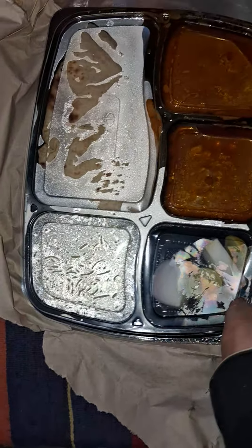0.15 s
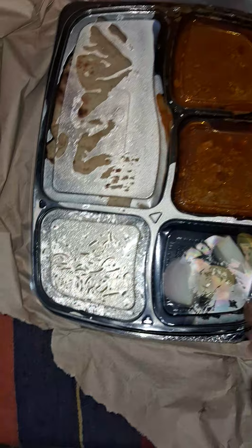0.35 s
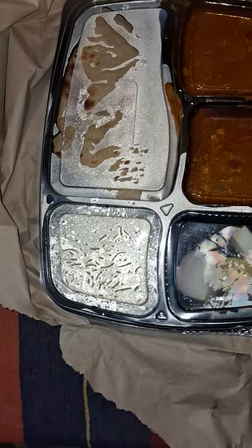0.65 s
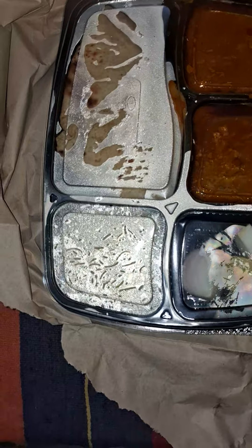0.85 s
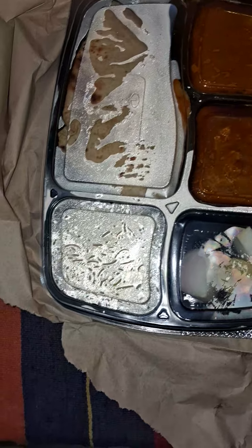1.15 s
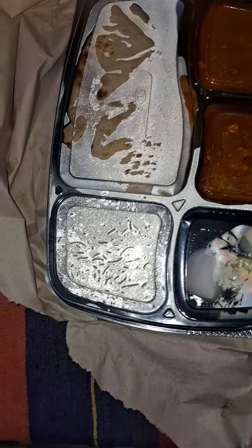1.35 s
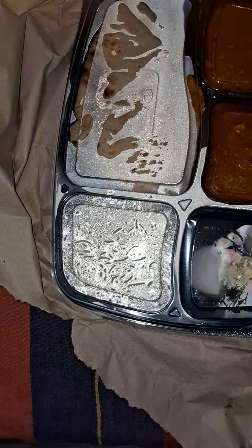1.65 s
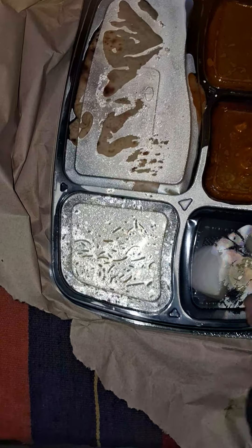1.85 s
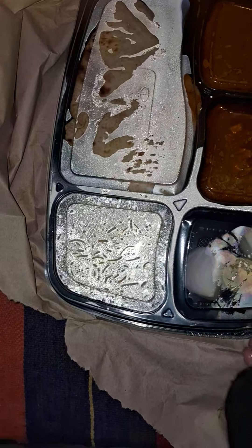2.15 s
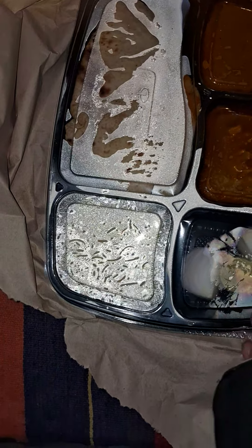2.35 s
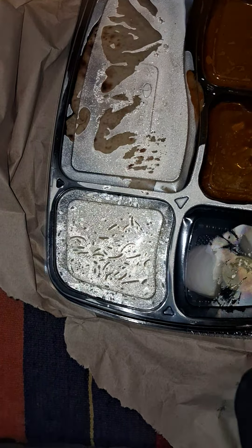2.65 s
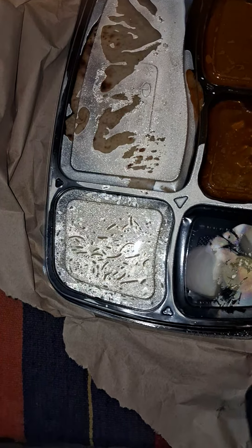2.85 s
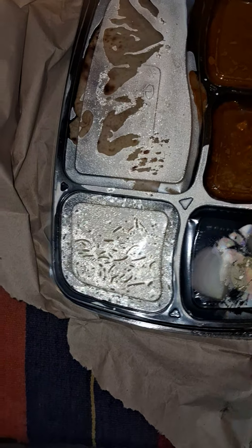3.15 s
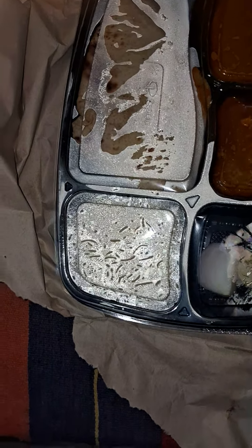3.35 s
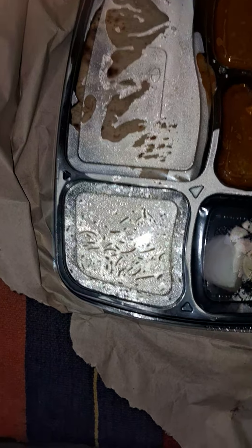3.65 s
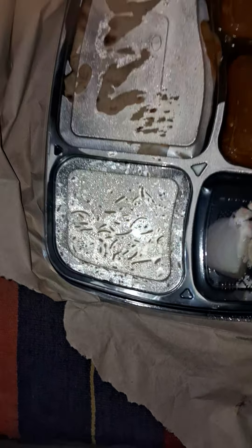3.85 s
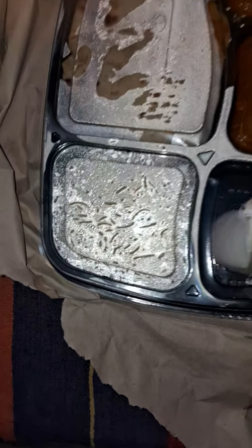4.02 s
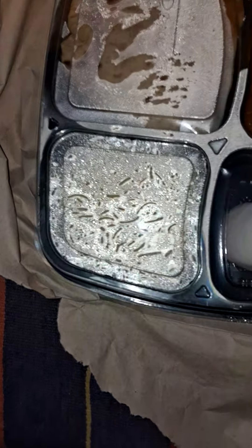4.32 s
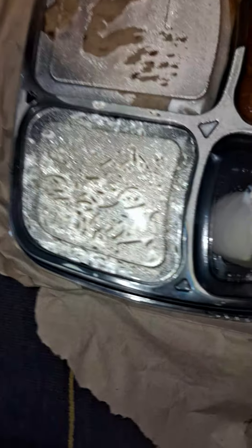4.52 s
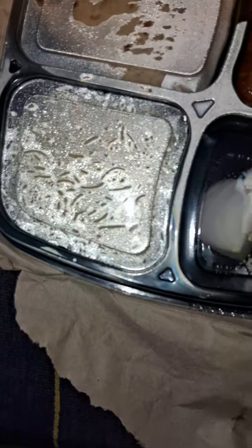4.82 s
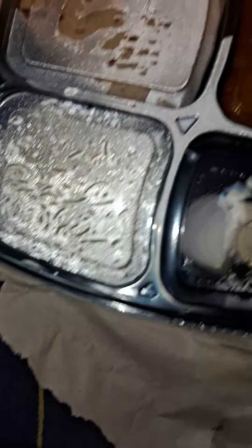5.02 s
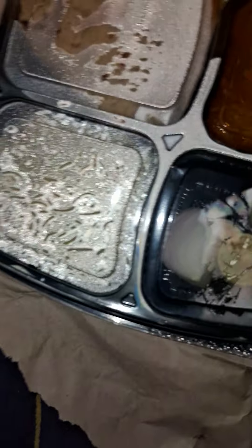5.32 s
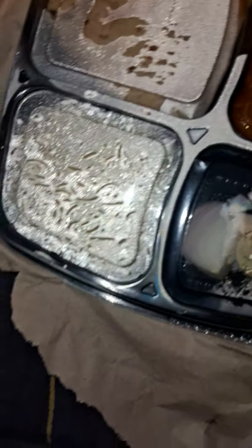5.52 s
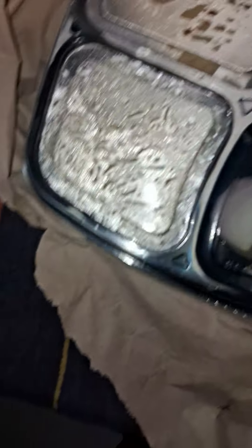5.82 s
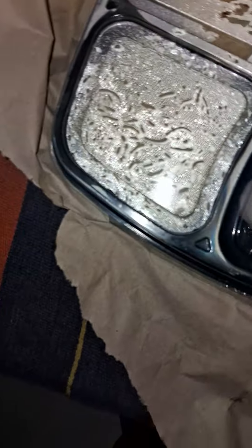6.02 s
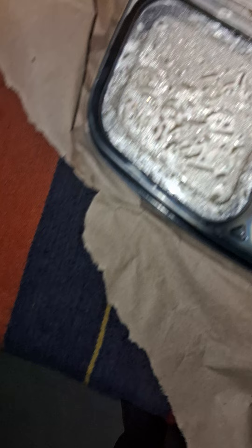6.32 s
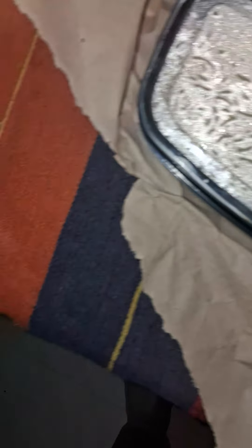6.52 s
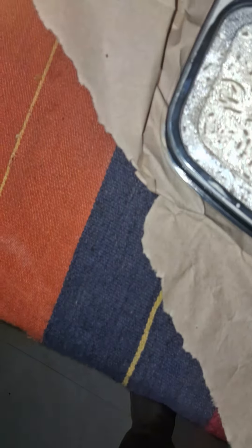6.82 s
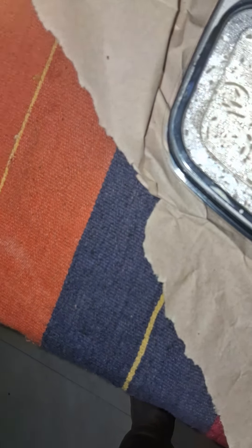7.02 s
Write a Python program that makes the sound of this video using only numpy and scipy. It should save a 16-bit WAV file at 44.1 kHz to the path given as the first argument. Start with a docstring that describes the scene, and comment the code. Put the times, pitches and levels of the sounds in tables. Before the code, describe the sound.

Paper wrapping rustles and crackles close up around a plastic meal tray, with sharp irregular plastic snaps in a small quiet room.

```python
"""Paper and film crackle round a plastic meal tray, worked by hand close to a phone in a small soft room.
Creases buckle with sharp snaps that ring the tray; between them the paper rustles in dense tiny creases,
the film hisses over the rim, and the tray creaks once. The room gives a short tail, over faint mains hum
and a low rumble that comes and goes, swelling into a thud under a loud tray snap.
Stereo, from the phone's two microphone ports."""
import sys
import numpy as np
from scipy import signal
from scipy.fft import rfft, irfft
from scipy.io import wavfile
from scipy.ndimage import uniform_filter1d

SR = 44100
rng = np.random.default_rng(int(sys.argv[2]) if len(sys.argv) > 2 else 0)


def dump(signal):
    """Clip the signal to [-1, 1] and save it as 16-bit WAV at the path in sys.argv[1]."""
    limited = np.clip(np.atleast_2d(signal).T, -1, 1)
    pcm = np.round(limited * 32767).astype(np.int16)
    wavfile.write(sys.argv[1], SR, pcm)


N = 316197

# quiet rustle between scrapes: t/s, level/dB, brightness/dB
QUIET_RUSTLE = [(0, -78, -1), (1.2, -73, -15), (1.45, -92, -6), (2.0, -84, -4), (2.6, -84, 0),
                (2.8, -70.5, 0), (3.1, -76, 0), (3.7, -70.5, -3), (4.3, -66.5, -11), (4.8, -62, -3.5),
                (5.3, -70.5, 0.5), (5.399, -77, 5), (5.7, -70.5, 5), (6.2, -66, -3), (6.9, -69, -1),
                (7.17, -87, 5)]
# scrapes of the paper, close up: start/s, length/s, level/dB, brightness/dB
PAPER_SCRAPES = [(0, .02, -64, -1.5), (0.087, 0.058, -62, -1), (0.314, 0.08, -66.5, 2.5),
                 (0.376, 0.15, -68, -2), (0.504, .025, -67, -12), (0.563, 0.084, -67.5, -2),
                 (0.642, 0.077, -60, -5), (0.752, 0.021, -58.5, 5.5), (0.911, 0.026, -71, 1),
                 (0.987, 0.051, -60, 5), (1.09, .18, -72.5, 2), (1.324, 0.065, -61, -22),
                 (1.51, 0.075, -58, -2), (1.62, 0.052, -62, -8), (1.711, 0.066, -66.5, -4.5),
                 (1.787, 0.077, -61.5, -4), (1.9, 0.026, -64, -7), (2, 0.022, -71.5, 5.5),
                 (2.097, .03, -73.5, -4), (2.217, 0.065, -61.5, -10), (2.28, .2, -68.5, 3.5),
                 (2.553, 0.025, -73, 2), (2.792, 0.13, -77, 4), (3.17, 0.05, -64, 4),
                 (3.278, 0.14, -62, 2.5), (3.451, 0.14, -59, -2), (3.81, 0.11, -60, -2.5),
                 (4.36, 0.31, -65.5, 2.5), (4.528, .14, -57, 3), (4.958, 0.062, -53.5, -8),
                 (5.034, 0.11, -61.5, 3.5), (5.403, 0.21, -58, -0.5), (5.816, .13, -55.5, 1.5),
                 (5.952, 0.024, -48.5, -1), (6.013, 0.048, -55.5, -8.5), (6.277, 0.12, -57.5, -5),
                 (6.472, 0.11, -63.5, 4.5), (6.677, 0.054, -66.5, 9.5), (7.07, 0.088, -65, 2.5)]
# resonances of the paper's low body, mid sheet and high hiss: f/Hz, width/Hz, level/dB
BODY_MODES = [(345, 173, -2), (641, 67, -3), (795, 272, 2), (1230, 400, -9.5)]
SHEET_MODES = [(1345, 220, 7.5), (2080, 235, 7.5), (2527, 1540, 1), (3740, 520, -10.5)]
HISS_MODES = [(5000, 1000, -10), (7310, 2000, 2), (10600, 8500, -4), (14300, 3200, -4.5)]
# crinkles against body, sheet and hiss: level/dB
CRINKLE_LEVELS = [-8, -7.5, -18]
# spectrum of the room tone: f/Hz, relative level/dB
ROOM_TONE = [(15, -52.5), (25, -26), (87, 3.5), (166, -3.5), (317, -7), (607, 8), (775, -6), (1130, -37),
             (1370, -3.5), (5570, -15), (7510, -15), (14800, -30.5), (16000, -36)]
# low rumble, swelling into a thud under the loud tray snap at 5.84 s: t/s, level/dB
LOW_RUMBLE = [(0, -94), (.18, -92), (.7, -99), (1.0, -84), (1.6, -89), (1.9, -100), (2.3, -86), (2.95, -86),
              (3.4, -99), (4.05, -80.5), (4.25, -68.5), (4.5, -81), (5.0, -98), (5.78, -77), (5.84, -65),
              (6.05, -90), (6.25, -100), (6.41, -75), (6.6, -68), (6.83, -77), (7.05, -100), (7.17, -100)]
# edges of the six bands of a snap (boom, knock, clack, tick, crack, sizzle): f/Hz
BAND_EDGES = [210, 500, 1100, 2200, 4500, 9500, 14800]
# colour common to all snaps, by band: level/dB
SNAP_COLOUR = [2.5, 0, 1.5, 6.5, 7.5, 4.5]
# part of each band that differs between the microphone ports: amplitude fraction
PORT_SPREAD = [.15, .3, .45, .6, .9, .95]
# snaps, close up: t/s, level/dB, favoured ring/Hz, crack/Hz,
# then relative: boom/dB, tick/dB, crack/dB, left minus right/dB, echo/dB
CREASE_SNAPS = [(0.035, -47, 1210, 5560, -20, -14.5, -31, -2.5, -15.5),
                (0.191, -55, 560, 4580, -3, -10, -27, 0, -19),
                (0.661, -48, 727, 7050, -14, -24, -28, 3, -14),
                (0.707, -48.5, 953, 8390, -19, -12, -20, 1.5, -10),
                (0.771, -42.5, 700, 8320, -25, -17, -13, 5, -12.5),
                (1.054, -44, 659, 4730, -20, -25, -27, 0.5, -19),
                (1.064, -42, 735, 7750, -12, -15, -17, -1, -17),
                (1.297, -28, 1790, 4510, -34, -20, -42, 1, -17.5),
                (1.391, -44.5, 700, 7180, -12, -30, -35, -3, -17),
                (1.545, -44.5, 570, 4650, -0.5, 1.5, -5.5, -4, -15.5),
                (1.911, -58, 640, 7600, -7, -12, -5.5, -1, -15),
                (2.024, -61, 2360, 5880, -20, 6, 5, -3, -12),
                (2.244, -60, 776, 6940, -11, -13, -3, 4.5, -14),
                (2.314, -36, 880, 9400, -13.5, 3, 0.5, -2, -16.5),
                (2.481, -48.5, 1770, 5440, -30, -1, -16, -7.5, -14),
                (2.551, -58.5, 1070, 4990, -24, -4, -10, -1.5, -17),
                (2.663, -21, 2010, 12100, -18, -4.5, -1.5, -1.5, -15.5),
                (2.846, -53, 1870, 6330, -13.5, -3, -1, 0.0, -21),
                (2.867, -56.5, 750, 4500, -17, -1, -8, -2.5, -15),
                (3.329, -41, 645, 6750, -12, -13, -18, 2.0, -14),
                (3.359, -42, 1960, 6560, -27, -8.5, -31, -10, -15),
                (3.405, -42, 1770, 7830, -23, -11, -20, 4, -14.5),
                (3.494, -40, 613, 4650, -17, -19, -24, 0.0, -15.5),
                (3.812, -47.5, 726, 5670, -22, 0, -10, -1, -11.5),
                (3.851, -40.5, 730, 5520, -29, -18, -28, 3.5, -24),
                (3.898, -22.5, 980, 7630, -15.5, -9.5, -20.5, -1, -21),
                (4.097, -26, 650, 5140, -30, -13, -24, 0.5, -21.5),
                (4.122, -29, 729, 5390, -29, -12.5, -33, 2, -22),
                (4.19, -13, 920, 5050, -22, -9.5, -20, 3.5, -19.5),
                (4.35, -33.5, 765, 7260, -21.5, -16, -16, 2, -18.5),
                (4.378, -54, 821, 6170, -2.5, -18, -22, 5, -25),
                (4.399, -30.5, 780, 5160, -18, -12, -17, 0, -20),
                (4.468, -45.5, 1410, 5620, -24, -2, -16, 2, -14),
                (4.6, -28, 596, 4500, -13.5, -4, -13.5, 3, -19),
                (4.623, -41, 920, 4500, -14, -13, -26, 1.5, -30),
                (4.762, -41.5, 870, 6900, -15.5, -22, -23, 4.5, -23),
                (4.821, -56.5, 1310, 7430, -7, -5, -4, 1.5, -19),
                (4.854, -26.5, 1030, 4510, -28, -1.5, -18.5, 4.5, -22),
                (4.965, -44.5, 800, 4910, -32, -0.5, -32, 4, -11.5),
                (5.149, -31, 774, 4590, -26, -11, -37, 3.5, -17.5),
                (5.17, -38, 1790, 4810, -21.5, -21, -31, -1.0, -24),
                (5.212, -19, 910, 5240, -27, -6, -13, -0.5, -21),
                (5.313, -51, 710, 5390, -22, -15, -14, 4, -24),
                (5.422, -37.5, 885, 4540, -15, -1, -13.5, 2.5, -18.5),
                (5.487, -44, 907, 4650, -11, -7, -23, 2, -17),
                (5.519, -23.5, 870, 4580, -13, -4.5, -21, 1.0, -21.5),
                (5.56, -43, 1410, 7330, -14, -12, -15, -5, -24),
                (5.591, -45.5, 1380, 6730, -15, -5, -14, 0, -22),
                (5.632, -49.5, 1380, 4520, -29, -6, -15, 1.5, -18),
                (5.664, -53.5, 3040, 5570, -19, 5, -15, -2, -19),
                (5.703, -53.5, 1370, 10500, -14, -11, -22, -1, -23),
                (5.808, -36, 910, 4510, -12, 0, -8.5, 2, -23.5),
                (5.838, -17.5, 930, 9800, -7.5, -5, -5, -2, -16.5),
                (5.988, -44, 732, 6700, -9, 2, -5.5, 8, -29),
                (6.059, -51, 969, 8600, -18, -3, -9, 1.0, -18),
                (6.098, -27.5, 840, 11500, -22, -35, -21, 5.5, -19),
                (6.297, -43, 813, 7810, -20, -31, -18, 3.0, -11),
                (6.308, -45, 2680, 10300, -18, 0.5, -13, 0, -12),
                (6.319, -31.5, 1330, 10000, -45, -12.5, -18, 4, -21),
                (6.339, -52, 894, 5170, -10, -9, -11, -0.5, -19),
                (6.563, -33.5, 2880, 12000, -21, 12, 11.5, 0.5, -18),
                (6.586, -16, 2640, 4740, -24.5, 3.5, -6.5, 3.5, -21),
                (6.732, -45, 1170, 9440, -24, -15, -13.5, 5, -19),
                (6.942, -53, 883, 8020, -21, -5, -6, 2.0, -21),
                (6.998, -59, 3120, 11100, -25, 6, 11.5, -1.5, -17.5),
                (7.061, -40.5, 890, 12400, -16.5, 3, 3.5, 3, -16),
                (7.134, -51, 1330, 7270, -18, -14, -23, -2.5, -16)]
# tray modes, a row for each of the four lower bands: f/Hz, t60/s
TRAY_MODES = [
    [(250, 0.0071), (305, 0.049), (400, 0.041)],
    [(620, 0.008), (730, 0.021), (870, 0.025), (1000, 0.0086)],
    [(1200, 0.0063), (1410, 0.017), (1750, 0.012), (2000, 0.017)],
    [(2400, 0.0013), (2750, 0.0066), (3400, 0.006), (4000, 0.0028)],
]
# how much sooner a snap reaches the left port: t/s, lead/samples
LEFT_LEAD = [(0, 1), (2.5, 1), (3.8, 5), (7.2, 4)]
# tail of the room, by band: t60/s, level/dB
ROOM_TAIL = [(0.25, 3.5), (0.21, 1.5), (0.22, -1.5), (0.24, -9), (0.22, -10), (0.11, -3)]
# slow slides of the film: start/s, end/s, f/Hz, width/Hz, level/dB
FILM_SLIDES = [(0.321, 0.495, 7850, 1500, -78.5), (0.318, 0.445, 2670, 900, -67.5),
               (1.097, 1.447, 7040, 1400, -84), (1.1, 1.295, 2400, 500, -85),
               (1.717, 1.89, 7400, 1540, -77), (2.942, 3.21, 4730, 700, -79),
               (3.271, 3.356, 2960, 600, -64.5), (4.674, 4.871, 1350, 300, -61.5),
               (5.444, 5.677, 2920, 700, -67)]
# mix of each slip in the creak: boom/dB, tick/dB, crack/dB, left minus right/dB, echo/dB
CREAK_MIX = [-21, -23, -44, 1, -21]
# resonances and dips of the phone body at the microphone: f/Hz, width/Hz, gain/dB
PHONE_BODY = [(353, 29, 3), (533, 384, -4.5), (865, 610, -2.5), (1340, 130, -4.5), (2078, 450, -9.5),
              (2800, 3100, 0), (4120, 1800, -4.5), (9360, 430, 1), (11000, 2220, 7.5), (16200, 540, -11.5)]

CREASES_PER_S, CRINKLES_PER_S, SIZE_SPREAD_DB = 3200, 150, 2.5
SCRAPE_ATTACK_S, SCRAPE_T60_S = .027, .28
HISS_DB, HISS_PER_BRIGHTNESS = -13, .39
ROOM_TONE_DB, HUM_DB, HUM_HZ = -72, -86, 100
SLIP_S, CRACK_S = .0003, .00036  # time constants
FAVOUR_DB, FAVOUR_OCTAVES = 12, .2  # lift of the modes near the favoured ring, and its reach
SPLIT_HZ, SPLIT_DB_PER_OCTAVE, SIZZLE_DB_PER_OCTAVE = 1050, 5.5, 8.5
FIRST_ECHO_S = .008
CREAK_START_S, CREAK_END_S, CREAK_FIRST_GAP_S, CREAK_GAP_RATIO = 3.998, 4.08, .015, .88
CREAK_DB, CREAK_RING_HZ, CREAK_CRACK_HZ = -35.5, 686, 5000


def undb(db):
    return 10 ** (np.asarray(db) / 20)


def unit(x):
    return x / np.sqrt(np.mean(x ** 2))


def resonate(x, hz, width):
    """Resonance of gain 1 at its centre."""
    return signal.lfilter(*signal.iirpeak(min(hz, .45 * SR), hz / width, fs=SR), x)


def in_band(x, k):
    """The part of x within band k."""
    return signal.sosfilt(signal.butter(2, BAND_EDGES[k:k + 2], "band", fs=SR, output="sos"), x)


def wander(rate):
    """Random levels held 1 / rate s and smoothed twice; spread near 1."""
    hold = int(SR / rate)
    steps = np.repeat(rng.standard_normal(N // hold + 1), hold)
    return 1.3 * uniform_filter1d(uniform_filter1d(steps, hold), hold)[:N]


def ports(noise, spread):
    """Left and right microphone ports, from one common and two separate noises."""
    spread = np.clip(spread, 0, 1)
    return np.sqrt(1 - spread ** 2) * noise[0] + spread * noise[1:]


def scrape_gains():
    """Gains of body, sheet and hiss: each scrape rises, holds and dies over the quiet rustle."""
    def layers(db, bright_db):
        return undb([db, db + bright_db, db + HISS_DB + HISS_PER_BRIGHTNESS * bright_db])

    t = np.arange(0, N + 64, 64) / SR
    times, db, bright_db = np.transpose(QUIET_RUSTLE)
    power = layers(np.interp(t, times, db), np.interp(t, times, bright_db)) ** 2
    for start, length, db, bright_db in PAPER_SCRAPES:
        rise = np.clip((t - start) / SCRAPE_ATTACK_S + (start == 0), 0, 1) ** 2
        fall = np.exp(-np.log(1000) * np.maximum(t - start - length, 0) / SCRAPE_T60_S)
        power += (layers(db, bright_db)[:, None] * rise * fall) ** 2
    return [np.interp(np.arange(N) / SR, t, np.sqrt(p)) for p in power]


def creases(per_s):
    """Tiny creases give way as impulses of random time and uneven size."""
    return (rng.random(N) < per_s / SR) * undb(SIZE_SPREAD_DB * rng.exponential(size=N))


def crinkles(modes):
    """Scattered small pops, each in one resonance of the paper and from its own side."""
    out = 0
    for hz, width, db in modes:
        pops = creases(CRINKLES_PER_S / len(modes))
        pan = rng.uniform(-1, 1, N)
        placed = pops * np.array([1 + pan / 2, 1 - pan / 2])
        out += undb(db) * resonate(resonate(placed, hz, width), hz, 2 * width)
    return unit(out)


def paper_rustle():
    """Close to the microphone, dense small creases gate the rubbing noise of the paper."""
    out = 0
    layers = zip(scrape_gains(), (BODY_MODES, SHEET_MODES, HISS_MODES), (.55, .85, 1.), CRINKLE_LEVELS)
    for gain, modes, spread, crinkle_db in layers:
        gate = unit(signal.lfilter([1], [1, -.9], creases(CREASES_PER_S))) + .53
        rub = gate * ports(rng.standard_normal((3, N)), spread)
        voiced = 0
        for hz, width, db in modes:
            voiced += undb(db + 1.6 * wander(25)) * resonate(resonate(rub, hz, width), hz, 2 * width)
        out += gain * (unit(voiced) + undb(crinkle_db) * crinkles(modes))
    return out


def room_tone():
    """Steady room noise, alike at both ports in the bass, mains hum and a low rumble that comes and goes."""
    t = np.arange(N) / SR
    f = np.maximum(np.fft.rfftfreq(N, 1 / SR), 1)
    hz, db = np.transpose(ROOM_TONE)
    shape = undb(np.interp(np.log(f), np.log(hz), db))
    air = irfft(ports(rfft(rng.standard_normal((3, N))), spread=.42 + f / 1500) * shape, N)
    hum = undb(HUM_DB + 2 * wander(1.7)) * np.sqrt(2) * np.sin(2 * np.pi * HUM_HZ * t)
    noise = ports(rng.standard_normal((3, N)), spread=.53)
    rumble = resonate(resonate(noise, hz=60, width=22), hz=91, width=30)
    rumble_db = np.interp(t, *np.transpose(LOW_RUMBLE))
    return undb(ROOM_TONE_DB) * unit(air) + hum + undb(rumble_db) * unit(rumble)


def snap_colour(ring_hz, crack_hz, boom_db, tick_db, crack_db):
    """Band levels in dB: a higher ring tips knock towards clack, a higher crack towards sizzle."""
    lean = SPLIT_DB_PER_OCTAVE * np.log2(ring_hz / SPLIT_HZ) * (ring_hz < BAND_EDGES[3])
    sizzle = SIZZLE_DB_PER_OCTAVE * np.log2(crack_hz / BAND_EDGES[5])
    return SNAP_COLOUR + np.array([boom_db, -max(lean, 0), min(lean, 0), tick_db,
                                   crack_db - max(sizzle, 0), crack_db + min(sizzle, 0)])


def snap(band_db, ring_hz, lead):
    """A brief slip rings the tray, most in the modes the crease's place favours, under a broad crack."""
    t = np.arange(2048) / SR
    noise, scatter = rng.standard_normal((3, len(t))), rng.standard_normal((4, 4))
    parts = []
    for k, modes in enumerate(TRAY_MODES):
        ring = 0
        for m, (hz, t60) in enumerate(modes):
            nearness = np.exp(-(np.log2(hz / ring_hz) / FAVOUR_OCTAVES) ** 2)
            gain = undb(FAVOUR_DB * nearness + 2.5 * scatter[k, m])
            ring += gain * np.sin(2 * np.pi * hz * t) * np.exp(-np.log(1000) * t / t60)
        slip = ports(noise, PORT_SPREAD[k]) * t ** 3 * np.exp(-t / SLIP_S)
        rung = signal.fftconvolve(slip[:, :256], ring[None])[:, :len(t)]
        parts.append(in_band(rung, k))
    for k in (4, 5):  # crack and sizzle
        burst = ports(noise, PORT_SPREAD[k]) * t ** 3 * np.exp(-t / CRACK_S)
        parts.append(in_band(burst, k))
    out = sum(undb(db) * p / np.abs(p).max(axis=1, keepdims=True) for db, p in zip(band_db, parts))
    out[1] = np.roll(out[1], int(round(lead)))
    return out


def close_snaps(rows):
    """Direct sound of the snaps at the microphone, and the power each sends into the room by band."""
    direct, sent = np.zeros((2, N + 2048)), np.zeros((len(ROOM_TAIL), N))
    for start, db, ring_hz, *mix, pan_db, echo_db in rows:
        band_db = db + snap_colour(ring_hz, *mix)
        sound = snap(band_db, ring_hz, lead=np.interp(start, *np.transpose(LEFT_LEAD)))
        i = int(start * SR)
        direct[:, i:i + sound.shape[1]] += sound * undb([[pan_db / 2], [-pan_db / 2]])
        sent[:, i] += undb(band_db + echo_db) ** 2
    return direct[:, :N], sent


def room_tail(sent):
    """Diffuse echoes of the small room build up after the first wall and die band by band."""
    t = np.arange(SR // 2) / SR
    out = 0
    for k, (t60, db) in enumerate(ROOM_TAIL):
        fade = np.clip(t / FIRST_ECHO_S, 0, 1) ** 4 * np.exp(-2 * np.log(1000) * t / t60)
        power = np.maximum(signal.fftconvolve(sent[k], fade)[:N], 0)
        noise = in_band(ports(rng.standard_normal((3, N)), 2.23 * PORT_SPREAD[k] + .12), k)
        out += undb(db + 2.5 * wander(120)) * np.sqrt(power) * unit(noise)
    return out


def film_slides():
    """Film drawn slowly over the rim hisses in one narrow band."""
    out = np.zeros((2, N))
    for start, end, hz, width, db in FILM_SLIDES:
        i, j = int(start * SR), int(end * SR)
        rub = ports(rng.standard_normal((3, SR // 2)), spread=.83)
        hiss = resonate(resonate(rub, hz, width), hz, width)
        out[:, i:j] += undb(db) * unit(hiss)[:, :j - i] * signal.windows.tukey(j - i, .4)
    return out


def tray_creak():
    """The tray wall sticks and slips in a quickening run of dull snaps; rows as in CREASE_SNAPS."""
    jitter, softness, detune = rng.standard_normal((32, 3)).T
    gaps = CREAK_FIRST_GAP_S * CREAK_GAP_RATIO ** np.arange(len(jitter)) * np.exp(.1 * jitter)
    starts = CREAK_START_S + np.cumsum(gaps) - gaps
    slips = zip(starts, CREAK_DB - 2 * softness, CREAK_RING_HZ * np.exp(.081 * detune))
    return [(t, db, hz, CREAK_CRACK_HZ, *CREAK_MIX) for t, db, hz in slips if t < CREAK_END_S]


def scene():
    """Snaps, creak, paper and film close up, with the short tail and the room tone."""
    direct, sent = close_snaps(list(CREASE_SNAPS) + tray_creak())
    return direct + room_tail(sent) + paper_rustle() + film_slides() + room_tone()


def record(dry):
    """The phone body colours the sound at the microphone, and the top is cut steeply."""
    for hz, width, db in PHONE_BODY:
        dry = dry + (undb(db) - 1) * resonate(dry, hz, width)
    return signal.sosfilt(signal.ellip(10, .2, 70, 16300, fs=SR, output="sos"), dry)


dry = scene()
out = record(dry)
dump(out)
```